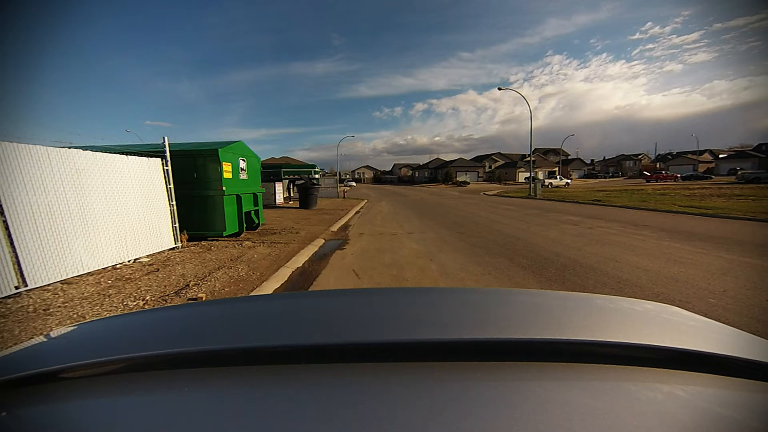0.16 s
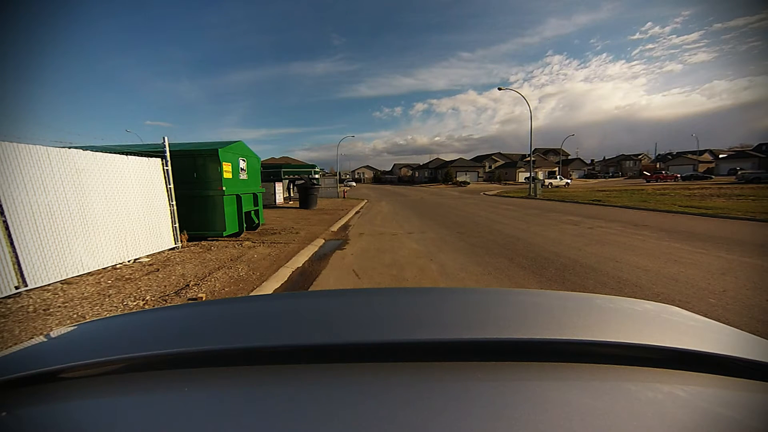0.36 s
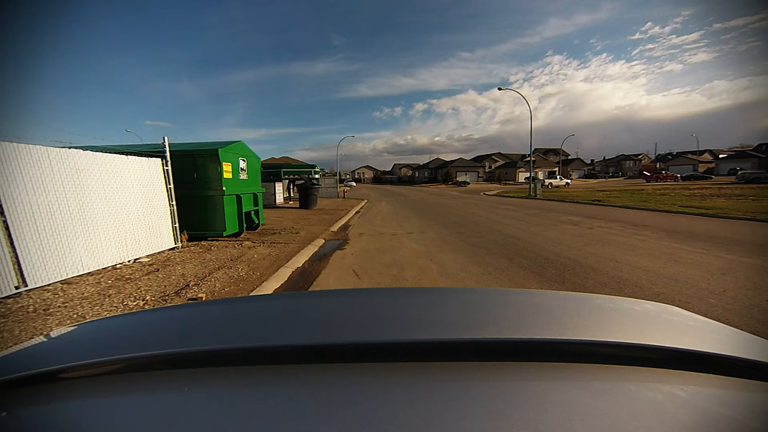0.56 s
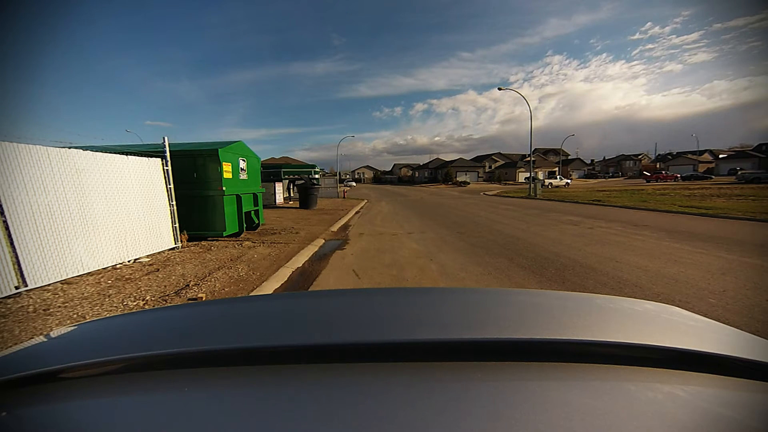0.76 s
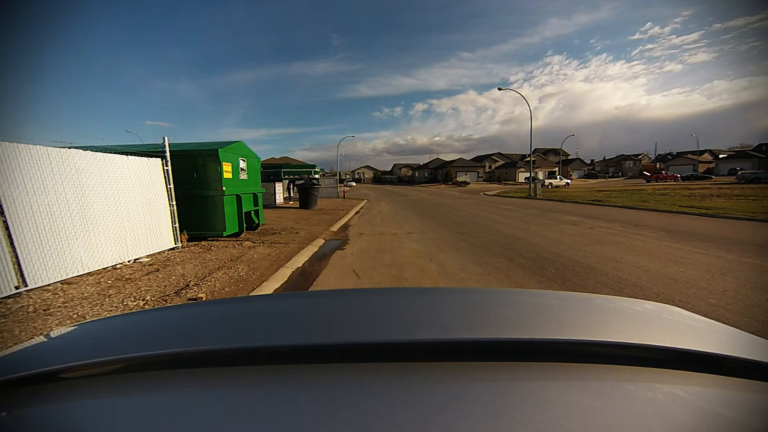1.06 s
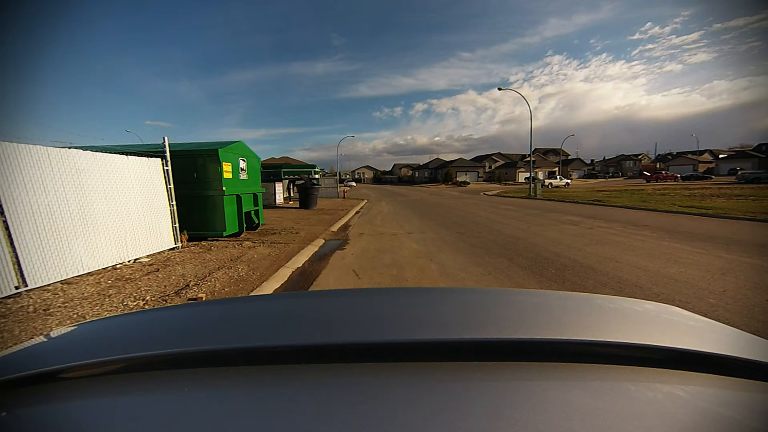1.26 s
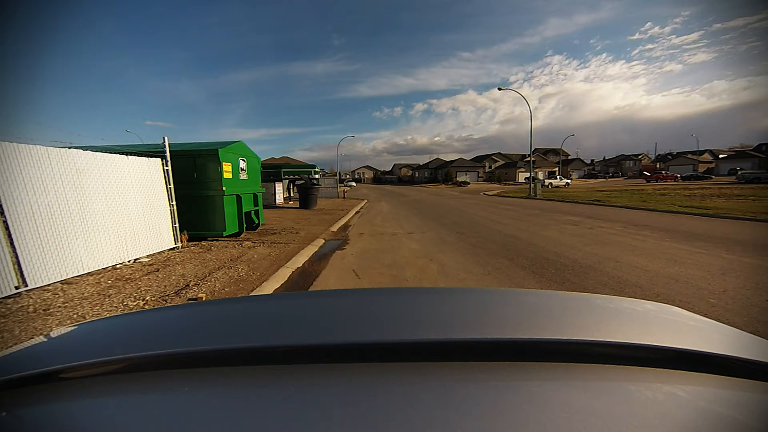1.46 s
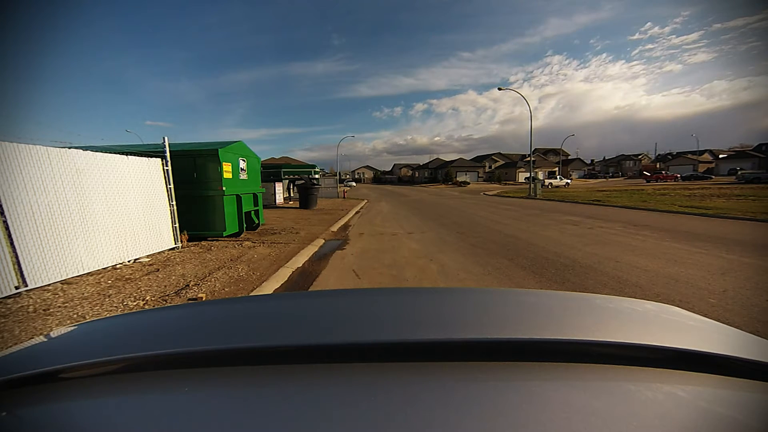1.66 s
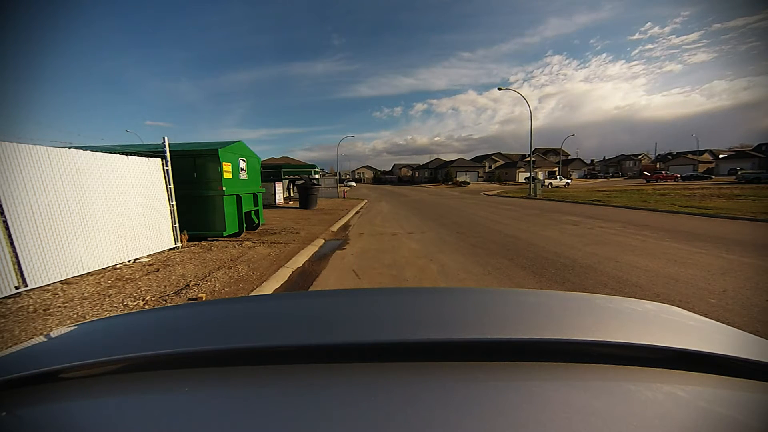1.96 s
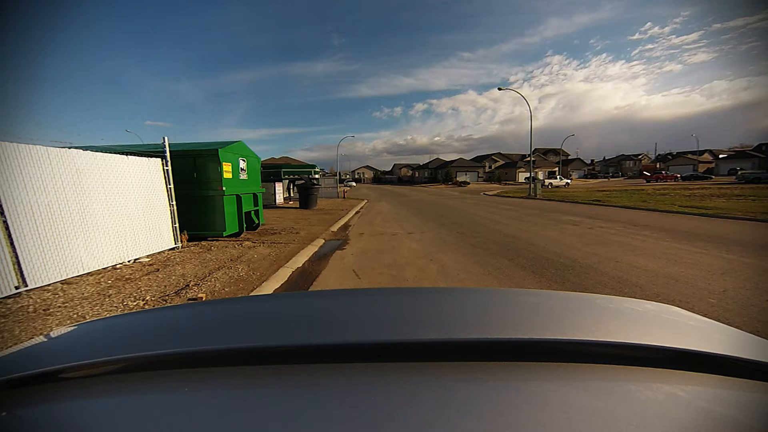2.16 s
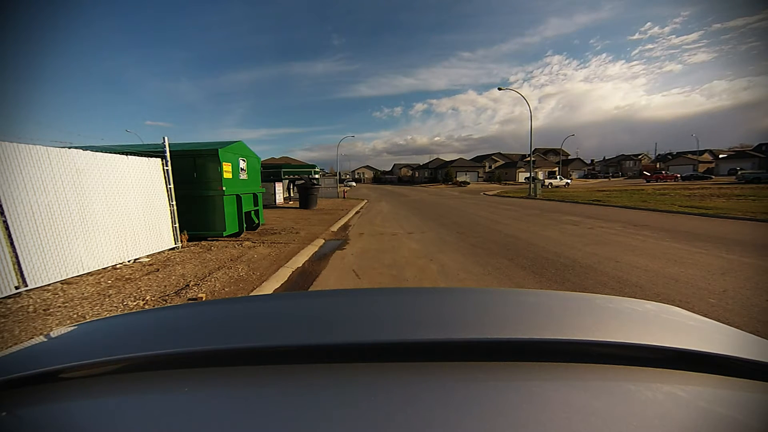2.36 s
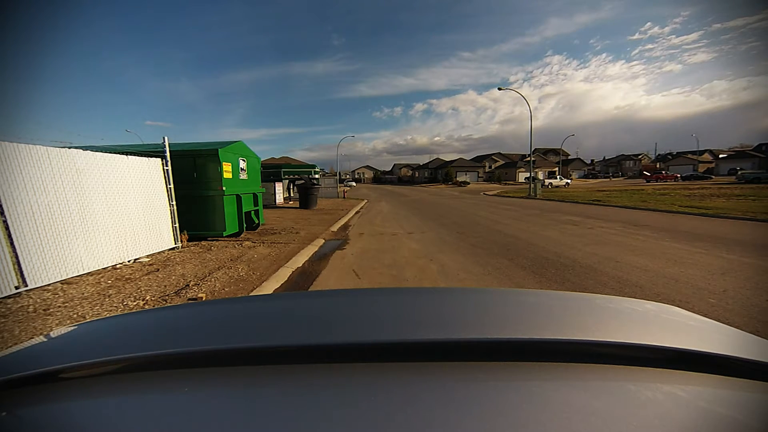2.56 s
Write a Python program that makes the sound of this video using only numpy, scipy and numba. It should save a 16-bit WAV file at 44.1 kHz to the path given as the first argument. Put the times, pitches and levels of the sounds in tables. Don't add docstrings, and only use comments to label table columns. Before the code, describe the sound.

A parked car's V6 with open exhaust roars up, burbles and thumps down, then roars again

```python
import sys
import numpy as np
from scipy import signal
from scipy.io import wavfile
from scipy.ndimage import uniform_filter1d
from numba import njit

SR = 44100
rng = np.random.default_rng(int(sys.argv[2]) if len(sys.argv) > 2 else 0)


def output_pcm(signal):
    pcm = np.clip(np.atleast_2d(signal).T, -1, 1) * 32767
    wavfile.write(sys.argv[1], SR, np.round(pcm).astype(np.int16))


def gain_from_db(level_db):
    decades = np.asarray(level_db, float) / 20
    return 10 ** decades


N = 119070
LEAD = 8192

# frequency_hz, density_db (per Hz)
FLOOR_SPECTRUM = [(590, -35), (1000, -1), (2030, -19), (2450, -20.5), (3020, -22), (5300, -20),
                  (6390, -32.5), (12300, -19), (14000, -33)]
WHINE_STARTS = [-.012, .255, .521, .786, 1.054, 1.32, 1.59, 1.852, 2.122, 2.178, 2.44, 2.659]
WHINE_LENGTHS = [.045, .042, .042, .045, .045, .045, .045, .045, .042, .02, .048, .045]
# pitch_hz, level_db
WHINE_PARTIALS = [(8468, -96), (11289, -87), (14115, -92)]
# frequency_hz, density_db (per Hz)
HISS_SPECTRUM = [(590, -30), (1000, 0), (1080, -18), (1880, -15), (2190, -21), (5360, -26.5), (9620, -48.5),
                 (11500, -38.5), (14000, -31)]
# centre_hz, width_hz, level_db
BAY_RESONANCES = [(1855, 440, -75), (3070, 1300, -76.5), (5180, 1300, -78.5), (7080, 1900, -85.5)]
# peak_s, length_s, rise_db (above its rest)
PANEL_SHAKES = [(0.301, 0.082, 12.5), (0.394, 0.074, 9), (0.773, 0.02, 15.5), (0.886, 0.063, 17),
                (1.022, 0.053, 16), (1.176, 0.084, 17), (1.305, 0.081, 0.5), (1.46, 0.047, 9),
                (1.569, 0.043, 15.5), (1.627, 0.044, 11.5), (1.735, 0.049, 8), (1.803, 0.076, 7.5),
                (1.93, 0.021, 12), (1.985, 0.037, 10), (2.081, 0.089, 2.5), (2.144, 0.028, 1),
                (2.266, 0.078, 11), (2.36, 0.066, 13)]
# peak_s, length_s, pitch_hz, level_db
PIPE_FLARES = [(.004, 0.024, 158, -29), (.6, 0.13, 439, -50), (.7, 0.097, 444.4, -53.5),
               (.8, 0.044, 454, -53), (.95, .07, 448, -50.5), (1.7, 0.073, 134, -47),
               (2.17, 0.045, 148.4, -49), (.78, 0.036, 43, -33.5), (.925, 0.084, 71.7, -36),
               (.93, 0.053, 46.7, -44), (.975, 0.033, 78.5, -39), (1.02, 0.07, 55.8, -36.5),
               (1.05, .04, 160.7, -38), (1.022, 0.073, 577, -52), (1.095, 0.032, 553, -49.5),
               (1.158, 0.033, 560, -49), (1.261, 0.026, 153, -40), (1.349, 0.16, 379.4, -53.5),
               (1.6, 0.073, 394, -56), (1.02, 0.049, 403, -49), (1.09, 0.039, 79.66, -31),
               (1.12, 0.065, 51, -32.5), (1.173, 0.087, 79, -30.5), (1.17, 0.066, 127, -40),
               (1.17, 0.039, 388.4, -46), (1.26, .09, 77.33, -28.5), (1.26, 0.069, 47.3, -40),
               (1.35, 0.053, 69, -32.5), (1.37, 0.09, 47.6, -33.5), (1.43, 0.031, 132, -39),
               (1.43, 0.028, 555, -50.5), (1.48, 0.081, 52, -33.5), (1.485, 0.025, 410, -46.5),
               (1.495, 0.044, 567, -50.5), (1.52, 0.029, 139, -45), (1.63, 0.049, 83.6, -42),
               (1.655, 0.039, 48, -39), (1.71, 0.061, 84.5, -39.5), (1.74, 0.12, 380.4, -56.5),
               (1.78, .05, 60.5, -46), (1.92, 0.051, 45.28, -43), (1.945, 0.035, 120, -50),
               (2.08, 0.091, 87.34, -47), (2.155, 0.042, 95.15, -44)]
# peak_s, level_db
AFTERFIRE_THUMPS = [
    (0.778, -62),
    (0.923, -42),
    (1.16, -40.5),
    (1.466, -43),
    (1.657, -43),
    (1.712, -67),
    (1.943, -43),
]
# time_s, firing_rate_hz, even_firing_db, overtone_db (sharpness), burble_db
ENGINE_COURSE = [(0, 79.84, -24.5, -12.5, -50), (.05, 85.29, -24.5, -9.5, -56.5),
                 (.095, 95.17, -24, -21, -48.5), (.15, 114.6, -29, -2, -39.5),
                 (0.248, 133.6, -26, -4.5, -58.5), (.33, 144.3, -25.5, -5.5, -47),
                 (0.448, 155.1, -30, 2.5, -54.5), (0.619, 164.3, -31, -6.5, -62),
                 (0.701, 164.5, -39, -10, -45), (.86, 158.9, -38.5, -20.5, -54),
                 (0.999, 150.8, -39, -19, -45), (1.32, 143.1, -51, -32, -39), (1.52, 115.6, -53, -5, -50),
                 (2.19, 71.89, -48.5, -13, -55), (2.32, 86, -29, -16, -44), (2.44, 116.5, -31.5, -1, -45),
                 (2.56, 141.5, -24.5, -4.5, -62), (2.7, 160.6, -32.5, 2, -40)]
CYLINDER_LEVELS = [0.1, 0.6, 0.4, -0.1, -0.3, 0.2]
# centre_hz, width_hz, even_db, burble_db, roar_db
RESONANCES = [(44, 49, -16, -2.5, -0.5), (83.06, 21, 0, 2.5, -5), (135.4, 47.7, 1, -3.5, 2.5),
              (156, 20.4, 1, -13.5, -0.5), (247.9, 27.3, 2.5, -6.5, -5.5), (306.8, 22.7, -11, -16, -6.5),
              (387.7, 69, -22, -14, -7), (426.8, 29.8, -1.5, -14, -13), (482.7, 54, -5, -21, -9),
              (562.4, 64, -10.5, -34.5, -6.5), (610, 64, -10.5, -38, -4), (808, 265, -14, -56.5, -14),
              (986.4, 55, -20, -60, -19), (1245, 460, -58.5, -54.5, -32)]
OPPOSED_RANGE = 275, 405


def set_rms(x, db):
    return x * gain_from_db(db) / np.sqrt(np.mean(x ** 2))


@njit
def band_pass(x, hz, width, sr):
    y, band, low = np.empty(len(x)), 0., 0.
    g, damping = np.tan(np.pi * hz / sr), width / hz
    for i in range(len(x)):
        v = (band + g * (x[i] - low)) / (1 + g * (g + damping))
        band = 2 * v - band
        low = low + 2 * g * v
        y[i] = damping * v
    return y


def ring(x, hz, width):
    hz, width, sr = float(hz), float(width), float(SR)
    return band_pass(band_pass(x, hz, width, sr), hz, width, sr)


def walk(rate_hz, size):
    hold = int(SR / rate_hz)
    levels = rng.standard_normal(size // 800)[:size // hold + 1]
    steps = np.repeat(levels, hold)
    return 1.3 * uniform_filter1d(uniform_filter1d(steps, hold), hold)[:size]


def coloured_noise(spectrum, size, flicker_db):
    hz_points, db_points = np.array(spectrum).T
    out = 0
    for hz in 1000 * 2 ** (np.arange(12) / 3):
        db = np.interp(np.log(hz), np.log(hz_points), db_points) + flicker_db * walk(12, size)
        out = out + gain_from_db(db) * ring(rng.standard_normal(size), hz, hz / 2.4)
    top = signal.ellip(6, .5, 30, 12800, fs=SR, output="sos")
    return set_rms(signal.sosfilt(top, out), 0)


def pulses(at, size, length):
    out, i = np.zeros(length + 2), at.astype(int)
    np.add.at(out, i, size * (1 - at + i))
    np.add.at(out, i + 1, size * (at - i))
    return out[:length]


def swell(t, peak_s, length_s):
    u = (t - peak_s) / length_s
    return np.exp(-4 * np.where(u < 0, u, u / 1.32) ** 2)


def camera(t):
    on = 0
    for start_s, length_s in zip(WHINE_STARTS, WHINE_LENGTHS):
        to_edge = np.minimum(t - start_s, start_s + length_s - t)
        on = on + np.clip(to_edge / .004, 0, 1)
    tone = sum(gain_from_db(db) * np.sqrt(2) * np.sin(2 * np.pi * hz * t) for hz, db in WHINE_PARTIALS)
    return gain_from_db(-75.5) * coloured_noise(FLOOR_SPECTRUM, len(t), 1.1) + on * tone


def engine_bay(t, hz, phase):
    time_s, _, firing_db, _, _ = np.array(ENGINE_COURSE).T
    load_db = 0.091 * (np.interp(t, time_s, firing_db) + 35)
    lagging_hz = uniform_filter1d(hz, size=6000, origin=2900)
    speed_db = 10.5 * np.log2(lagging_hz / 160)
    gate = 1 + 0.068 * np.cos(2 * np.pi * phase)
    wash = gain_from_db(-66) * coloured_noise(HISS_SPECTRUM, len(t), 1.0)
    bands = sum(set_rms(ring(rng.standard_normal(len(t)), f, w), db) for f, w, db in BAY_RESONANCES)
    return (wash + bands) * gate * gain_from_db(load_db + speed_db)


def panel(t):
    hz = 234.4 + 4.5 * walk(24.96, len(t))
    fits = 1 + sum(gain_from_db(db) * swell(t, s, length) for s, length, db in PANEL_SHAKES)
    level = gain_from_db(-59 + 1.5 * walk(17, len(t)))
    return fits * level * np.sqrt(2) * np.sin(2 * np.pi * np.cumsum(hz) / SR)


def flares(t):
    sag = .03
    start_phase = 2 * np.pi * rng.random(60)
    out = 0
    for (peak_s, length_s, hz, db), start in zip(PIPE_FLARES, start_phase):
        since = t - peak_s
        cycles = hz * since * (1 - sag * since / length_s / 2)
        tone = np.sin(2 * np.pi * cycles + start)
        out = out + gain_from_db(db) * np.sqrt(2) * swell(t, peak_s, length_s) * tone
    return out


def afterfire_thumps(t):
    width_s = 0.0015 / 4
    return sum(30 * gain_from_db(db) * np.exp(-.5 * ((t - s) / width_s) ** 2) for s, db in AFTERFIRE_THUMPS)


def firings(t, hz, phase):
    n = len(t)
    time_s, _, *levels_db = np.array(ENGINE_COURSE).T
    load, sharp, burble = (gain_from_db(np.interp(t, time_s, db)) for db in levels_db)
    k = np.arange(1, int(phase[-1]))
    timing, strength, misfire = rng.standard_normal((600, 3))[:len(k)].T
    at = np.interp(k + 0.0069 * timing, phase, np.arange(n))
    unit = SR / np.interp(at, np.arange(n), hz) / np.sqrt(2)
    cylinder_db = np.array(CYLINDER_LEVELS)[k % 6] + 1.22 * strength
    clicks = pulses(at, unit * gain_from_db(cylinder_db), n)
    clicks = signal.sosfiltfilt(signal.butter(2, 500, fs=SR, output="sos"), clicks)
    fundamental = np.sqrt(2) * np.cos(2 * np.pi * phase)
    even = load * (sharp * clicks + (1 - sharp) * fundamental)
    banks = gain_from_db(-1.5) * (-1.) ** k
    uneven = pulses(at, unit * (misfire + banks), n)
    return load, burble, even, uneven


def exhaust(t, hz, phase):
    n = len(t)
    load, burble, even, uneven = firings(t, hz, phase)
    thumps = afterfire_thumps(t)
    out = panel(t) + flares(t)
    low_hz, high_hz = OPPOSED_RANGE
    for f, width, even_db, burble_db, roar_db in RESONANCES:
        flow = 30 * gain_from_db(-10) * rng.standard_normal(n)
        lumps = gain_from_db(4 * walk(14, n))
        rough = burble * (uneven + flow) * lumps + thumps
        if f < 100 or low_hz < f < high_hz:
            side = -1
        else:
            side = 1 if f < 550 else gain_from_db(-8)
        out = out + ring(side * gain_from_db(even_db) * even + gain_from_db(burble_db) * rough, f, width)
        octaves_up = max(np.log2(f / 250), 0)
        speed_db = (8 + 1.2 * octaves_up) * np.log2(hz / 160)
        roar = 30 * gain_from_db(-52 + speed_db) * (50 * load) ** (0.29 * octaves_up)
        out = out + gain_from_db(roar_db) * ring(roar * rng.standard_normal(n), f, width * 0.85)
    return signal.sosfilt(signal.butter(2, 1450, fs=SR, output="sos"), out)


def scene():
    t = np.arange(-LEAD, N) / SR
    time_s, rate_hz = np.array(ENGINE_COURSE).T[:2]
    hz = uniform_filter1d(np.interp(t, time_s, rate_hz), size=1500)
    phase = np.cumsum(hz) / SR
    mix = exhaust(t, hz, phase) + engine_bay(t, hz, phase) + camera(t)
    return mix[None, LEAD:]


def low_pass(x):
    return signal.sosfilt(signal.butter(12, 14320, fs=SR, output="sos"), x)


def record(dry):
    mix = signal.sosfilt(signal.butter(2, 25, "high", fs=SR, output="sos"), dry)
    return low_pass(mix)


dry = scene()
out = record(dry)
output_pcm(out)
```